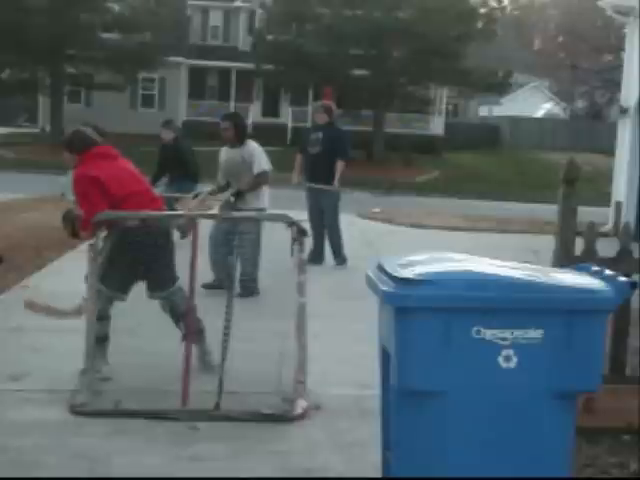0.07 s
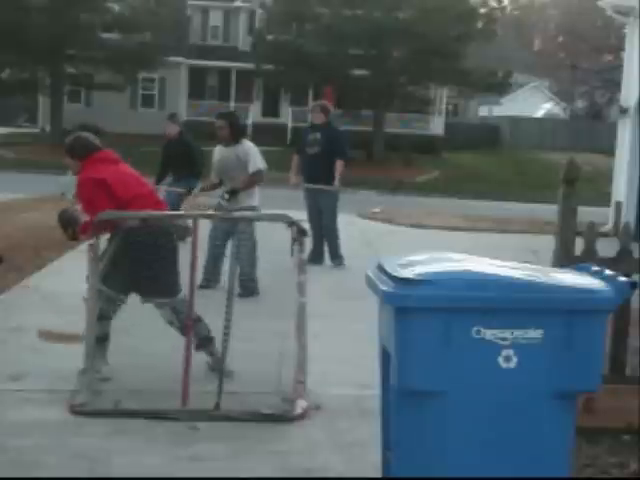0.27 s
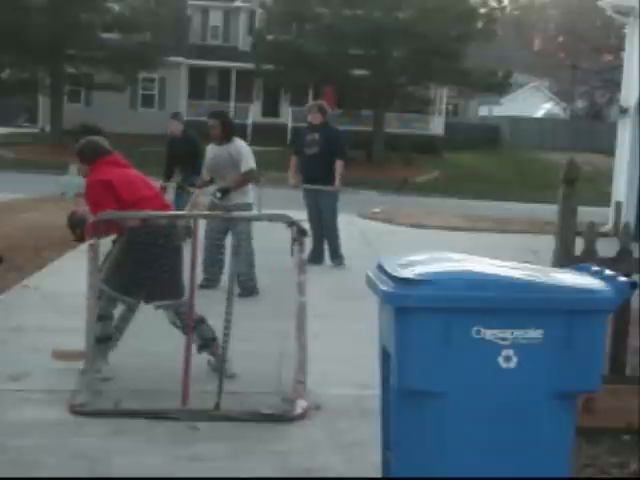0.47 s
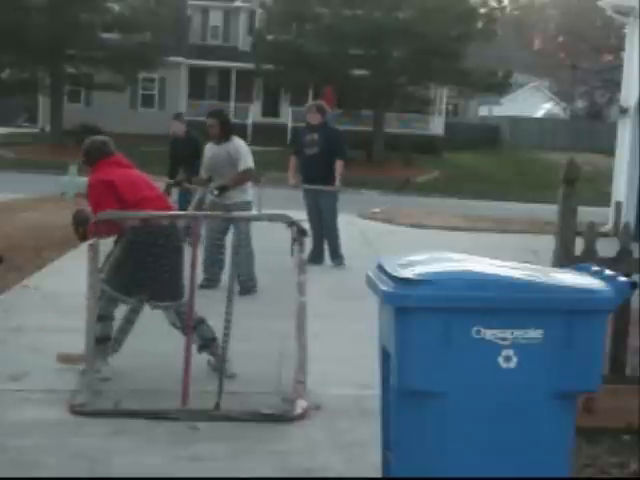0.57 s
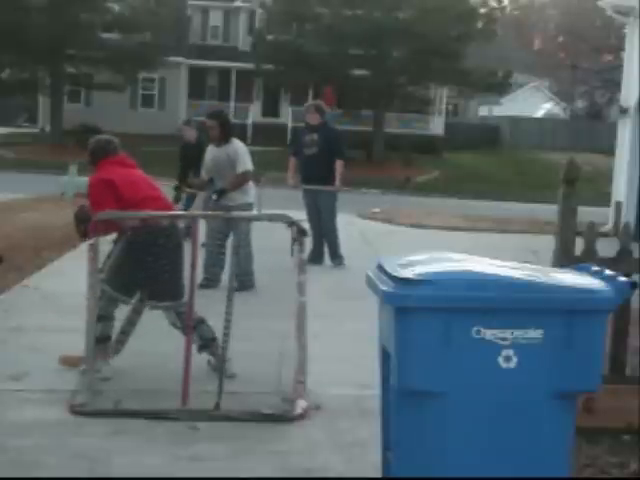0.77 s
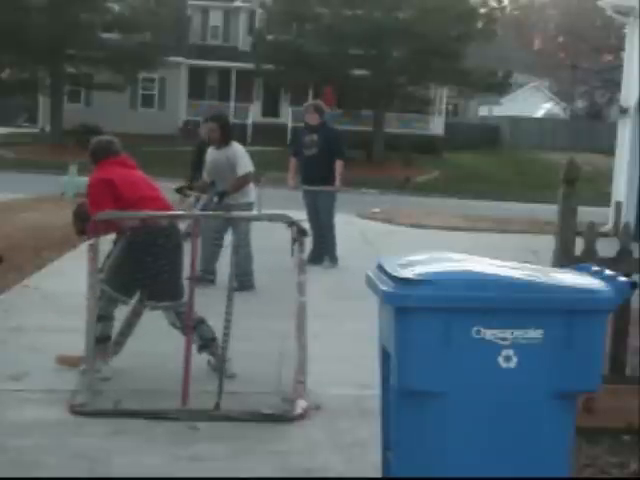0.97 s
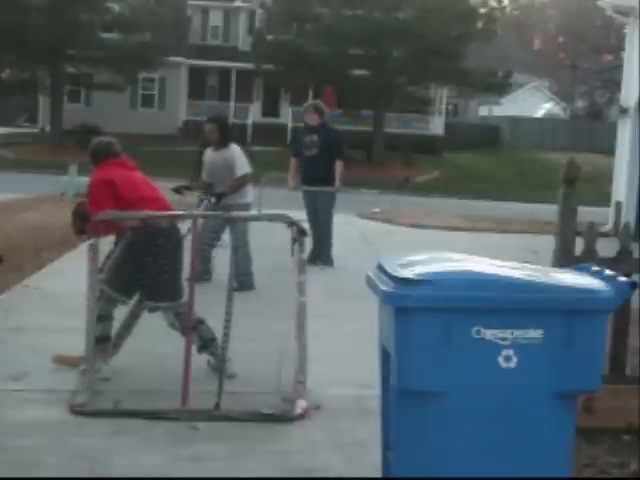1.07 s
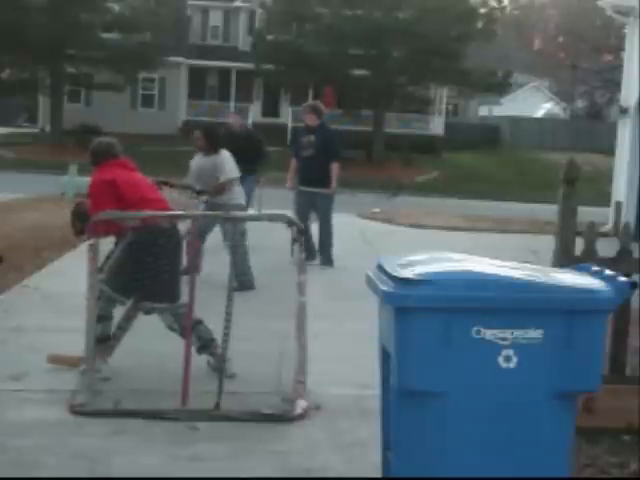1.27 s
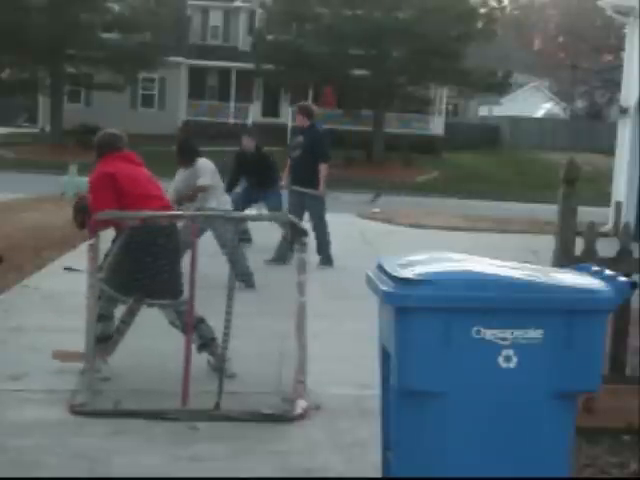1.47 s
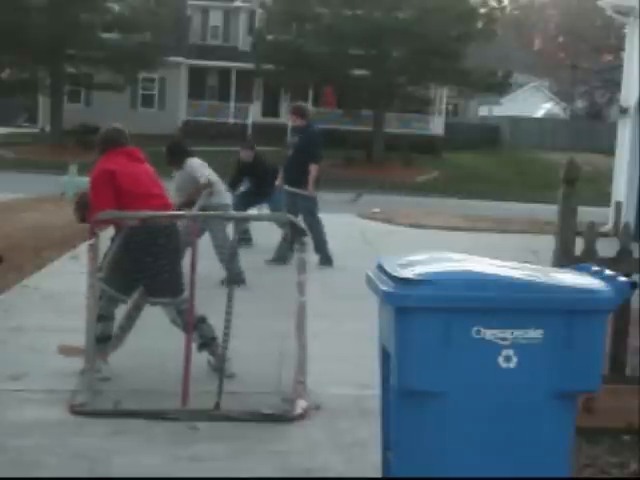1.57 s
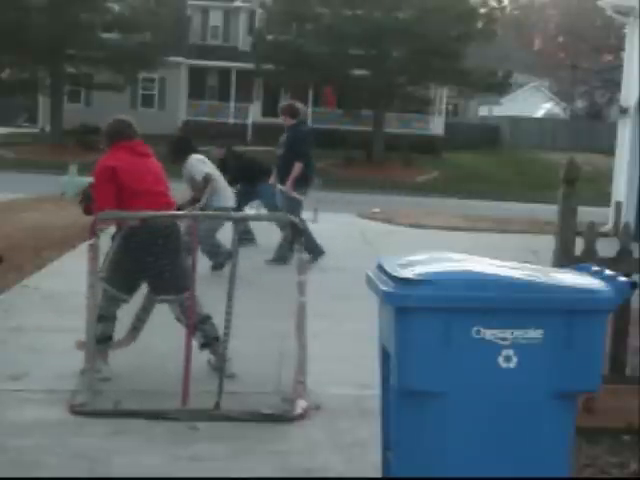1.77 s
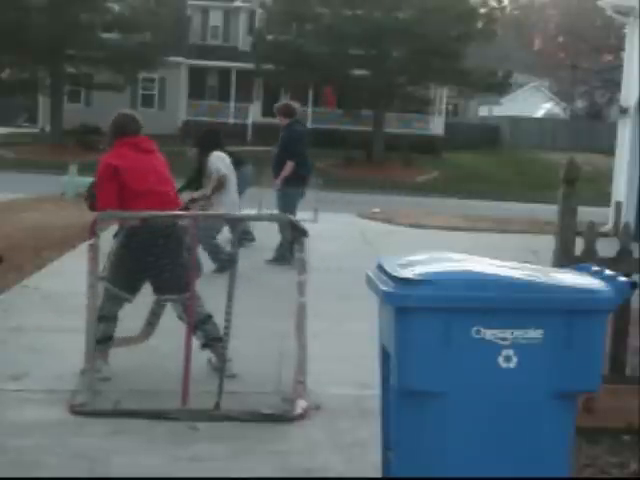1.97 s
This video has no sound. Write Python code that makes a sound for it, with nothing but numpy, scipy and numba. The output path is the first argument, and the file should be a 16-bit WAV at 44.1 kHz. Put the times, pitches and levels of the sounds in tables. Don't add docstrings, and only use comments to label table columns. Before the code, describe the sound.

One sharp, overloaded stick crack on a hard ball, with faint scuffs and low outdoor hum

```python
import sys
import numpy as np
from scipy import signal
from scipy.fft import rfft, irfft
from scipy.io import wavfile
from scipy.ndimage import uniform_filter1d
from numba import njit

SR = 44100
rng = np.random.default_rng(int(sys.argv[2]) if len(sys.argv) > 2 else 0)


def output_pcm(signal):
    pcm = np.clip(np.atleast_2d(signal).T, -1, 1) * 32767
    wavfile.write(sys.argv[1], SR, np.round(pcm).astype(np.int16))


def volts(x):
    e = np.asarray(x, float) / 20
    return 10 ** e


N = 88861

# frequency in Hz, level in dB per Hz.
HUM_TONE = [(15, -22), (35, -2), (65, -0.5), (200, -6), (1200, -7), (1600, -16), (4900, -19), (5600, -27)]
# centre in seconds, length in seconds, level in dB, pitch in Hz.
SCUFF_STROKES = [(.005, 0.053, -40.5, 1060), (0.032, 0.023, -36, 4500), (0.034, 0.028, -37.5, 1150),
                 (0.057, 0.028, -36, 2400), (0.069, 0.024, -35.5, 1370), (0.112, 0.0095, -42, 4540),
                 (0.164, 0.0071, -40, 3500), (0.169, 0.019, -41, 1000), (0.202, 0.011, -43.5, 2200),
                 (0.294, 0.019, -42.5, 3530), (0.355, 0.068, -43.5, 2800), (0.423, 0.13, -43, 4400),
                 (0.766, 0.038, -37, 4400), (0.759, 0.035, -39, 2600), (0.789, .04, -36, 500),
                 (0.802, 0.046, -36, 1800), (0.846, 0.033, -41, 1990), (0.938, 0.029, -40.5, 4480),
                 (0.957, 0.031, -34, 2660), (0.959, 0.029, -40, 4500), (1.556, 0.028, -41.5, 4300),
                 (1.069, 0.032, -41.5, 4270), (1.065, 0.055, -41.5, 2500), (1.185, 0.017, -35, 980),
                 (1.202, 0.06, -44.5, 2000), (1.453, .01, -42.5, 4800), (1.538, 0.036, -36, 1740),
                 (1.686, 0.054, -30.5, 4800), (1.831, 0.011, -42, 4770), (1.757, .03, -33.5, 1160)]
# frequency in Hz, level in dB per Hz.
STREET_TONE = [(200, -19), (600, -5.5), (1100, -2), (1600, -4), (2900, 1.5), (3700, -8), (4700, -4.5),
               (5600, -16.5)]
# frequency in Hz, level in dB per Hz.
NEAR_TONE = [(150, -35), (500, -22), (1300, -7), (1650, -10.5), (2200, -7), (3100, -4.5), (3700, -13),
             (4700, -3.5), (5600, -21)]
# centre in seconds, peak in dB, pitch in Hz, length in seconds.
BALL_KNOCKS = [
    (1.5680, -19, 1000, .003),
    (1.5690, -27, 380, .006),
    (1.6951, -23, 1000, .005),
    (1.8467, -16, 820, .0019),
    (1.847, -29, 300, .004),
    (.8455, -30, 1300, .002),
    (1.609, -22, 1200, .003),
    (1.9485, -32, 1500, .001),
]
# centre
# in seconds, peak in dB, pitch in Hz, length in seconds.
STICK_CRACKS = [(1.56728, 2.3, 2720, .0022), (1.5674, -15, 4300, .002), (1.5688, -15, 4200, .0014),
                (1.5700, -8, 2300, .0014), (1.5775, -13, 3300, .002), (1.5864, -7, 2400, .0014),
                (1.5876, -6, 3200, .0016), (1.5960, -9, 3900, .0014), (1.5972, -14, 4700, .0025),
                (1.6060, -19, 4700, .002), (1.6117, -14, 4400, .002), (1.6819, -23, 4800, .0025),
                (1.6935, -21, 3000, .001), (1.8467, -31, 2200, .0006)]


@njit
def svf(x, hz, width):
    y, band, low = np.empty(len(x)), 0., 0.
    g, k = np.tan(np.pi * hz / SR), width / hz
    for i in range(len(x)):
        v = (band + g * (x[i] - low)) / (1 + g * (g + k))
        band, low, y[i] = 2 * v - band, low + 2 * g * v, k * v
    return y


def level(x, db):
    return x * volts(db) / np.sqrt(np.mean(x ** 2))


def walk(rate):
    hold = int(SR / rate)
    steps = np.repeat(rng.standard_normal(N // hold + 1), hold)
    slewed = uniform_filter1d(uniform_filter1d(steps, hold), hold)
    return 1.3 * slewed[:N]


def colour(x, tone):
    hz, db = np.array(tone).T
    f = np.maximum(np.fft.rfftfreq(N, 1 / SR), 1)
    gain = volts(np.interp(np.log(f), np.log(hz), db))
    return level(irfft(rfft(x) * gain, N), 0)


def grit(grain_db):
    return rng.standard_normal(N) * volts(grain_db * rng.exponential(size=N))


def blows(table, glide):
    t, out = np.arange(N) / SR, np.zeros(N)
    rise_share = .48
    for centre, db, hz, length in table:
        u = t - centre
        shape = np.exp(-(2 * u / length / np.where(u < 0, rise_share, 1)) ** 2)
        out += volts(db) * shape * np.cos(2 * np.pi * hz * (u + glide * u ** 2 / 2))
    return out


def far_motor():
    motor_hz, width_hz = 84.6, 9.3
    swell_s, swell_length_s, swell_db = 2.1, 0.1, 5
    drone = level(svf(rng.standard_normal(N), motor_hz, width_hz), -51.5)
    t = np.arange(N) / SR
    return drone * volts(swell_db * np.exp(-((t - swell_s) / swell_length_s) ** 2))


def suburban_hum():
    noise = np.zeros(N)
    for hz in 25 * 2 ** np.arange(0, 8.5, .5):
        noise += svf(rng.standard_normal(N), hz, hz / 2) * volts(0.7 * walk(9.88))
    f = np.maximum(np.fft.rfftfreq(N, 1 / SR), 20)
    flat = irfft(rfft(noise) * np.sqrt(1 + (25 / f) ** 2), N)
    motor = far_motor()
    return level(colour(flat, HUM_TONE), -39.5) * volts(0.52 * walk(2.5)) + motor


def scuffs():
    t, out = np.arange(N) / SR, np.zeros(N)
    drag = grit(3.5) * volts(1.63 * walk(200))
    for centre, length, db, hz in SCUFF_STROKES:
        hz, width = 1. * hz, 0.92 * hz
        tone = svf(svf(drag, hz, width), hz, width)
        out += level(tone, db) * np.exp(-(2 * (t - centre) / length) ** 2)
    return out


def echoes():
    crack_s, hold_s = 1.5668, 0.025
    near_t60_s, street_t60_s = 0.16, 1.2
    u = np.arange(N) / SR - crack_s
    onset = np.clip(u / .003, 0, 1)
    near = colour(grit(0.5) * volts(0.96 * walk(250)), NEAR_TONE)
    near *= volts(-19 - 60 * np.maximum(u - hold_s, 0) / near_t60_s)
    street = colour(rng.standard_normal(N) * volts(.7 * walk(60.35)), STREET_TONE)
    street *= volts(-27.5 - 60 * np.maximum(u, 0) / street_t60_s)
    return onset * (near + street)


def ball_knocks():
    return blows(BALL_KNOCKS, glide=0)


def stick_crack():
    return blows(STICK_CRACKS, glide=130)


def scene():
    return (stick_crack() + ball_knocks() + echoes() + scuffs() + suburban_hum())[None]


def band_limit(x):
    return signal.sosfilt(signal.butter(12, 15970, fs=SR, output="sos"), x)


def record(dry):
    top_hz, offset, ceiling = 5450, -.0028, 1.02
    band = signal.ellip(10, .15, 45, top_hz, fs=SR, output="sos")
    narrow = signal.sosfiltfilt(band, dry)
    mix = np.clip(narrow + offset, -ceiling, ceiling)
    return band_limit(mix)


dry = scene()
out = record(dry)
output_pcm(out)
```